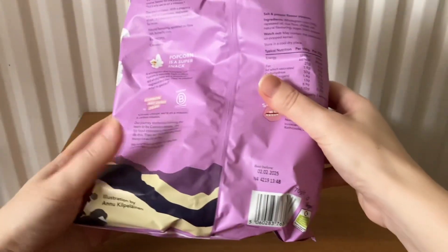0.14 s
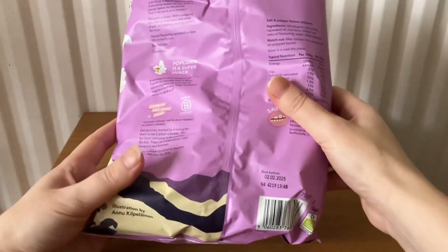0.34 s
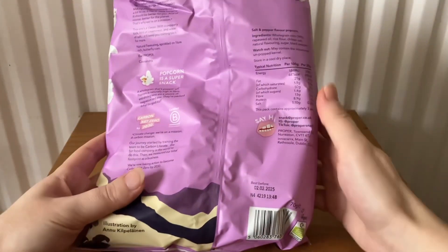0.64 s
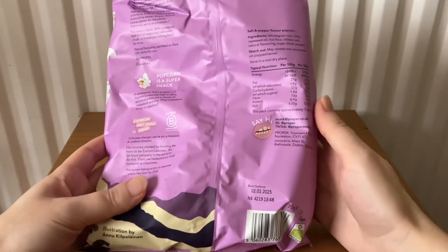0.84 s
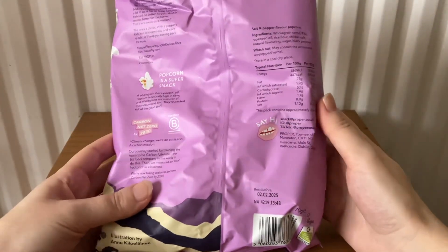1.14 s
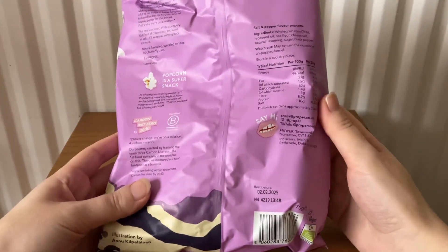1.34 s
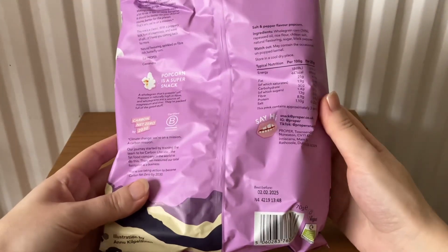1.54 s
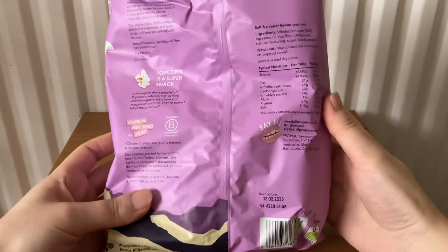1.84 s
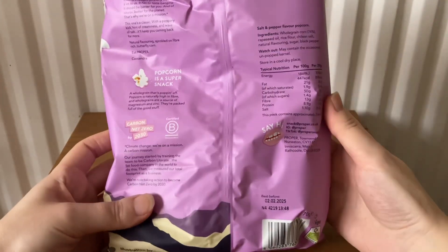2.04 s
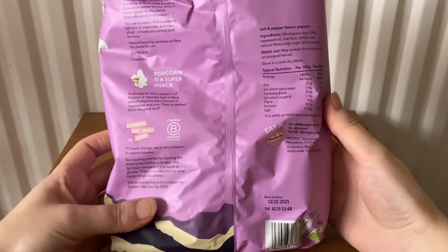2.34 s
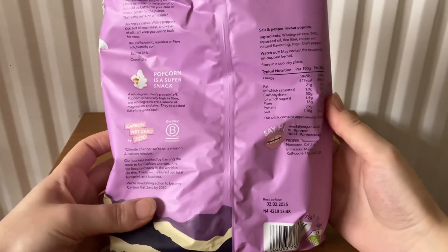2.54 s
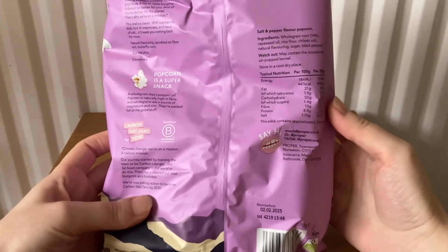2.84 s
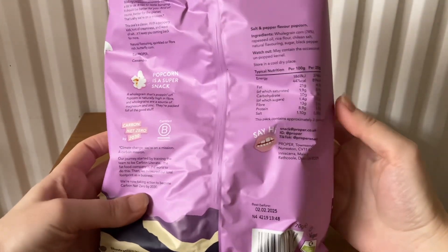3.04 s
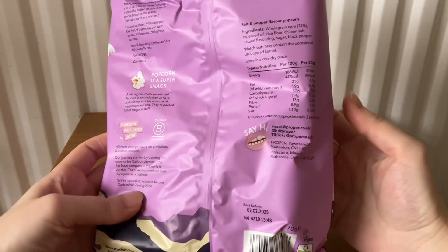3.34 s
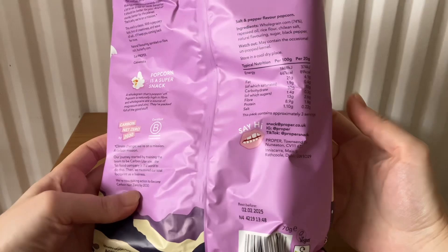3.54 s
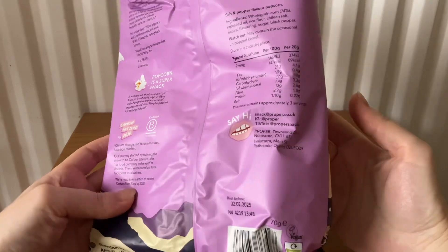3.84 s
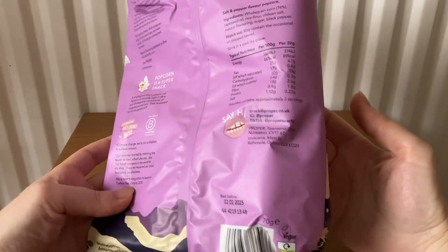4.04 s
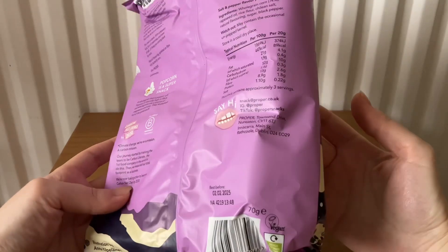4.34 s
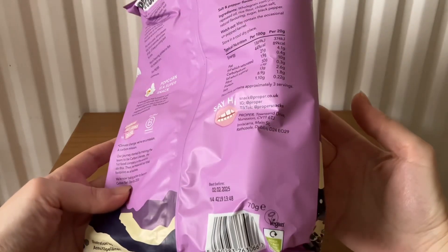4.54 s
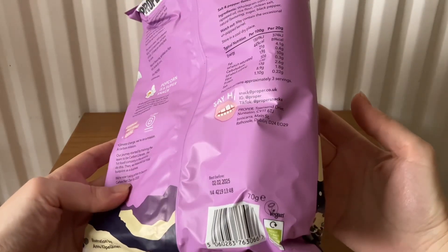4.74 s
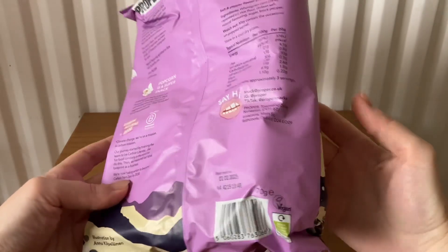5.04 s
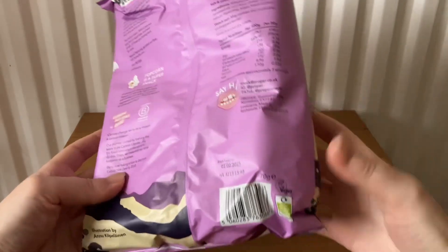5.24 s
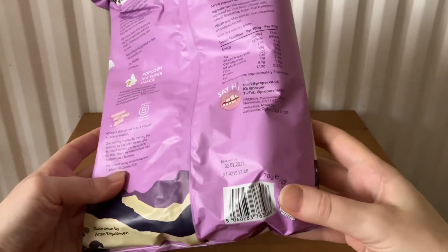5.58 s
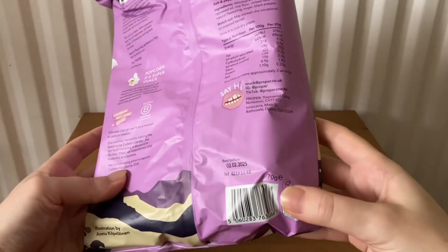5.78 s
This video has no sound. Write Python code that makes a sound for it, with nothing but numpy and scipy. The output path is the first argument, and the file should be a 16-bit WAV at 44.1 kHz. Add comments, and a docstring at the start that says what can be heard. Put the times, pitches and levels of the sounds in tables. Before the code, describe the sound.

A plastic snack bag crinkles and snaps as hands turn it, with soft thumps, thinning to faint rustles before a last crackle.

```python
"""Snack bag turned by hand

Two hands turn a full plastic bag over a wooden table, close to a phone in a quiet room.
Creases of the film snap one by one, small ones rustle round them and under sliding fingertips,
and the air and filling inside thump. Table and walls echo it over a low room hum.
The phone's low cut slides up twice, briefly."""
import sys
import numpy as np
from scipy import signal
from scipy.fft import rfft, irfft
from scipy.io import wavfile

SR = 44100
rng = np.random.default_rng(int(sys.argv[2]) if len(sys.argv) > 2 else 0)


def file_out(sig):
    """Save sig as 16-bit WAV at sys.argv[1]."""
    # one column per channel
    cols = np.atleast_2d(sig).T
    # limit, then scale
    lim = np.clip(cols, -1, 1)
    pcm = np.round(lim * 32767).astype(np.int16)
    wavfile.write(sys.argv[1], SR, pcm)


N = 260631
SIDES = np.array([[1], [-1]])  # left, right


def undb(db):
    return 10 ** (np.asarray(db) / 20)


def unit_rms(x):
    return x / np.sqrt(np.mean(x ** 2))


def band(x, lo_hz, hi_hz):
    sos = signal.butter(2, [lo_hz, min(hi_hz, .45 * SR)], "band", fs=SR, output="sos")
    return signal.sosfilt(sos, x)


def add(out, start_s, x):
    i = max(int(start_s * SR), 0)
    x = x[..., :N - i]
    out[:, i:i + x.shape[-1]] += x


# Noise floor: (frequency [Hz], relative density [dB])
HUM_SPECTRUM = [(30, -25), (87, -5), (147, -27.5), (192, -22), (318, -42),
                (473, -28.5), (3030, -47.5), (17000, -59)]

def hum(level_db=-72.5):
    """Building rumble and microphone hiss; the bass is alike on both sides."""
    f = np.fft.rfftfreq(N, 1 / SR) + 1
    hz, db = np.transpose(HUM_SPECTRUM)
    mid, side = rfft(rng.standard_normal((2, N)))
    noise = mid + np.clip(0.24 + f / 900, 0, 1) * side * SIDES
    colour = undb(np.interp(np.log(f), np.log(hz), db))
    return undb(level_db) * unit_rms(irfft(noise * colour, N))


def room(x):
    """Diffuse echo of table and walls: treble dies first, bass is alike on both sides."""
    t = np.arange(int(.4 * SR)) / SR
    mid, side = rng.standard_normal((2, len(t)))
    noise = mid + band(side, 1600, 14000) * SIDES
    onset = np.clip(t / 0.00026, 0, 1)
    response = 0
    for lo_hz, hi_hz, t60_s, db in [(100, 7200, 0.13, -12), (4500, 9800, 0.013, -16)]:
        tail = band(noise, lo_hz, hi_hz) * 1000 ** (-t / t60_s) * onset
        response = response + undb(db) * tail / np.sqrt(np.sum(tail ** 2) / 2)
    response[:, 0] += 1  # direct sound
    return signal.fftconvolve(x, response, axes=1)[:, :N]


# Resonances of the enclosed air: (centre [Hz], width [Hz], gain [dB])
AIR_RESONANCES = [(170, 35, 3.5), (350, 200, 3), (480, 60, 4.5), (612, 130, -8), (900, 150, 3)]

def bag_air(x):
    """Air shut in the bag lifts a few low resonances, with a dip between them."""
    return x + sum((undb(db) - 1) * signal.lfilter(*signal.iirpeak(hz, hz / width_hz, SR), x)
                   for hz, width_hz, db in AIR_RESONANCES)


# Fingertip slides: (start [s], length [s], level [dB])
SLIDES = [(3.031, 0.028, -57), (3.878, 0.089, -68), (4.193, 0.015, -68), (4.566, 0.11, -71.5),
          (4.755, 0.12, -71.5), (5.02, 0.11, -59)]

def slide_power(t, rise_s=0.016, trail_s=0.027):
    """Rustle power under a fingertip sliding on the film: rise, hold, trail."""
    power = 0
    for start_s, length_s, db in SLIDES:
        rise = np.minimum((t - start_s) / rise_s, 0)
        trail = np.maximum((t - start_s - length_s) / trail_s, 0)
        power = power + undb(db) ** 2 * np.exp(2 * (rise - trail))
    return power


def flurry_power(t, snap_db=-28.5, thump_db=-17, build_s=0.0062, settle_s=0.019):
    """Rustle power of creases shaken loose round each snap or thump: builds before, settles after."""
    kicks = np.zeros(N)
    for events, relative_db in ((SNAPS, snap_db), (THUMPS, thump_db)):
        for time_s, db, *_ in events:
            kicks[int(time_s * SR)] += undb(db + relative_db) ** 2
    lag_s = t[:SR] - .5
    envelope = np.exp(2 * np.where(lag_s < 0, lag_s / build_s, -lag_s / settle_s))
    return np.clip(signal.fftconvolve(kicks, envelope)[SR // 2:SR // 2 + N], 0, None)


# Fingers working the film: (time [s], level [dB], bass gain [dB], treble gain [dB])
HANDLING = [(0, -62.5, -4.5, 1.5), (.32, -73, -7, 7.5), (.5, -60, -3, 2), (.95, -58, -3.5, -1.5),
            (1.27, -44.5, -1.5, -5.5), (1.33, -50, -5.5, -2), (1.49, -61, -3, 0), (1.63, -56, -1.5, -1.5),
            (1.84, -60, -3, -6.5), (2.08, -65, 1, 1.5), (2.276, -53, -3.5, -6.5), (2.399, -72.5, -6, -2),
            (2.8, -61, 1, -5), (3.149, -69, -0.5, -1), (3.581, -74, -1.5, -2), (4.101, -72.5, -1.5, -3.5),
            (4.259, -94, -2.5, 2), (5.0, -78.5, -4.5, -2), (5.409, -78, -8, -2.5), (5.683, -45.5, -3, -5.5),
            (5.81, -60, -2.5, 1.5), (5.91, -74, -1.5, 5)]
# Rustle colour: (frequency [Hz], band gain [dB])
RUSTLE_SPECTRUM = [(130, -9.5), (250, -0.5), (420, 2), (630, -1.5), (900, 1.5), (2000, -1.5), (4000, 2),
                   (7000, 2.5), (12000, 2.5), (16000, -14)]

def rustle(creases_per_s=1100, spread_db=3.0, skin_hiss=1.1, band_db=-6.5):
    """Dense tiny creases, mostly faint; skin sliding on the film fills the gaps with even hiss."""
    t = np.arange(N) / SR
    times_s, *curves = np.transpose(HANDLING)
    handling_db, bass_db, treble_db = (np.interp(t, times_s, curve) for curve in curves)
    level = np.sqrt(undb(handling_db) ** 2 + flurry_power(t) + slide_power(t))
    creases = (rng.random(N) < creases_per_s / SR) * undb(spread_db * rng.exponential(size=N))
    colour_hz, colour_db = np.transpose(RUSTLE_SPECTRUM)
    out, strength = 0, rng.standard_normal(N)
    for hz in 130 * 2 ** np.arange(0, 7.1, .5):
        strength = .8 * strength + .6 * rng.standard_normal(N)  # correlated from band to band
        share = undb(11.0 * np.clip(strength, -2, 2) * min(hz / 1500, 1))
        decay_s = 0.0011 * (4000 / hz) ** .5
        bursts = signal.lfilter([1], [1, -np.exp(-1 / (decay_s * SR))], creases * share)
        envelope = unit_rms(bursts) + skin_hiss
        mid, side = rng.standard_normal((2, N))
        noise = mid + (0.15 + 0.66 * min(hz / 2500, 1)) * side * SIDES
        crackle = unit_rms(band(envelope * noise, hz / 2 ** 0.22, hz * 2 ** 0.4))
        bass = np.clip(np.log2(2400 / hz) / 2.2, 0, 1)
        treble = np.clip(np.log2(hz / 3000), 0, 1)
        gain_db = band_db + np.interp(np.log(hz), np.log(colour_hz), colour_db)
        out = out + level * undb(gain_db + bass * bass_db + treble * treble_db) * crackle
    return out


# The filled bag gives way: (time [s], level [dB], nominal pitch [Hz], upper note gain [dB])
THUMPS = [(0.084, -49, 510, -25), (0.156, -44.5, 554, -18), (0.234, -48.5, 313, -6.5),
          (0.386, -45, 328, -19), (0.408, -48, 408, -16), (0.473, -39, 470, 2), (0.481, -36, 460, -1.5),
          (0.596, -32, 364, -18), (0.64, -32, 395, -9), (0.735, -37.5, 463, -2.5), (0.867, -43, 310, -6),
          (0.963, -48, 364, -7), (1.026, -47, 278, -19), (1.062, -42, 302, -9), (1.115, -31.5, 370, -14.5),
          (1.188, -37, 477, -14), (1.211, -33.5, 440, -24), (1.249, -31, 436, 0), (1.27, -25.5, 395, -12.5),
          (1.273, -36.5, 131.8, -23), (1.398, -38.5, 334, -8), (1.577, -38.5, 367, -14.5),
          (1.639, -36.5, 453, -9.5), (1.746, -35, 480, -15), (1.805, -36.5, 450, -0.5),
          (1.872, -25, 400, -11), (1.893, -23, 196, -44.5), (1.898, -40, 122, -16.5),
          (1.916, -35.5, 363, -8.5), (2.017, -36.5, 530, -11), (2.274, -32.5, 384, -2.5),
          (3.048, -39.5, 463, -27), (3.426, -45.5, 345, -4), (3.612, -46.5, 290, -22),
          (3.808, -50.5, 390, -8), (3.907, -44.5, 137, -11), (4.139, -56, 200.6, -8),
          (5.057, -48.5, 480, -20), (5.556, -41, 446, -6), (5.626, -43, 430, -1), (5.685, -30, 352, -7.5),
          (5.692, -37.5, 126, -12), (5.764, -40.5, 413, -4), (5.822, -36.5, 342, -12)]

def thumps():
    """Soft push of the whole bag: a few cycles sagging in pitch, with a hollow note above."""
    out, t = np.zeros((2, N)), np.arange(3000) / SR
    phases_rad = 0.19 * rng.standard_normal((len(THUMPS), 1)) * [.5, -.5]
    for (time_s, db, hz, upper_db), phase_rad in zip(THUMPS, phases_rad):
        upper = undb(upper_db)  # taut bag: more upper note, longer ring, less sag
        decay_s = (0.51 + 0.33 * upper) / hz
        sag_s = 14 * decay_s * (1 + 3 * upper)
        angle = 2 * np.pi * 1.09 * hz * sag_s * np.log(1 + t / sag_s)
        notes = np.sin(angle + phase_rad[:, None]) + upper * np.sin(1.9 * angle)
        envelope = undb(db + 9.0) * t / decay_s * np.exp(-t / decay_s)
        add(out, time_s - .0003, envelope * notes)
    return out


# Snap colour breakpoints, bass and body up to fizz: (frequency [Hz])
SNAP_COLOUR_HZ = [300, 1100, 3700, 11000, 17000]
# Snapping creases: (time [s], level [dB], ring [Hz], body gain [dB], fizz gain [dB])
SNAPS = [(0.1757, -36, 2580, -4.5, -22), (0.182, -29.5, 2550, -37, -23), (0.23, -38, 4100, -18, -12.5),
         (0.3861, -23, 6750, -55, -19.5), (0.4714, -33, 1000, -25, -20), (0.479, -29, 880, -32, -21),
         (0.577, -29.5, 905, -2.5, -5.5), (0.61, -21, 1680, -7, -6), (0.6407, -25.5, 920, -11, -47),
         (0.7319, -25, 7600, -11.5, -13.5), (0.776, -27.5, 2000, -10.5, -16),
         (0.824, -34.5, 1020, 2.5, -15), (0.8679, -36, 900, -2, -15), (0.9589, -29, 3940, -2.5, -6.5),
         (1.0265, -19, 2460, -23, -19), (1.088, -29, 1800, -5, -16), (1.1151, -24, 1060, 1.5, -4.5),
         (1.1613, -27.5, 5170, -9, -20), (1.213, -31.5, 638, -1, -16), (1.2485, -14.5, 11900, -9, -9.5),
         (1.2622, -22.5, 900, -5, -9), (1.2829, -27, 6490, -14.5, -16), (1.383, -28, 970, -2.5, -10.5),
         (1.399, -33, 870, -8, -15), (1.5774, -40.5, 780, 7.5, -27), (1.612, -22, 1430, -6, -11.5),
         (1.6404, -26, 1110, -11, -13), (1.6932, -35.5, 930, 4.5, -27), (1.7476, -21.5, 1170, -12, -18.5),
         (1.871, -18.5, 6850, -7, -11.5), (1.8911, -21.5, 2020, -2, -30), (1.916, -42, 7600, -25, -4),
         (1.986, -27, 1340, 5, -1.5), (2.1268, -35.5, 1210, 3, -15.5), (2.2406, -31, 3300, 0.5, -18),
         (2.2564, -29.5, 1510, 3.5, -5), (2.276, -27, 2250, 2.5, -12.5), (2.3037, -23.5, 2520, -10, -20.5),
         (2.416, -59, 1360, 9.5, -30), (2.4662, -49.5, 7830, -34, -0.5), (2.504, -49, 2240, 4.5, -3.5),
         (2.516, -45.5, 986, -2, -18), (2.599, -54.5, 2060, -26, -2), (2.6519, -43, 2520, 7.5, -17.5),
         (2.667, -32, 1896, -1.5, -11.5), (2.835, -44.5, 2460, 1, -2), (2.857, -58, 7600, -8, -3),
         (2.875, -51, 2800, -6, -11), (2.95, -43, 1290, -4.5, -3.5), (3.0528, -50, 704, -20, -16.5),
         (3.19, -52, 7800, -1, -1), (3.2049, -36, 1990, -14.5, -15), (3.2182, -41, 4390, -28, -14),
         (3.263, -36.5, 1950, -12, -19), (3.2863, -47, 1990, -27, -8), (3.3506, -48, 800, -6, -8),
         (3.4123, -43.5, 855, -5, -43), (3.4237, -33, 775, -2, -10), (3.531, -48, 1140, -3.5, -12),
         (3.636, -25.5, 906, -1, -12.5), (3.7367, -50.5, 920, 2, -3), (3.7674, -47.5, 850, -2.5, -3),
         (3.8702, -51, 746, 6, -13), (3.8979, -46, 6600, -10, -8), (3.9449, -38, 680, 2, -19.5),
         (4.0255, -37.5, 1160, -4, -29), (4.116, -64, 7100, -5, -4.5), (4.1282, -54.5, 613, 13.5, -50),
         (4.161, -45, 7200, -28, -15), (4.531, -55, 4600, -3, -13), (4.564, -48.5, 7340, -34, -18),
         (4.5856, -36, 1320, -14, -9.5), (4.653, -56, 3030, -4, -6), (4.7525, -51.5, 3600, -22, -6),
         (4.7585, -50, 860, 0, -5), (4.778, -55, 900, 6, -8), (4.8468, -53.5, 780, 8, -6),
         (4.858, -57.5, 7600, -19, 8), (4.8863, -41, 1290, -5, -14), (5.0014, -46, 6900, -6.5, -16.5),
         (5.029, -48.5, 1160, 2, 4.5), (5.098, -51, 1830, 1, 0.5), (5.105, -38.5, 770, 3.5, -46),
         (5.1288, -55, 1284, -1, 6.5), (5.152, -56, 5000, -10, -3), (5.432, -51, 3630, -9, -10),
         (5.482, -45, 850, -5, -7.5), (5.5491, -37.5, 720, 0.5, -16), (5.582, -41.5, 1510, 3.5, -18),
         (5.6084, -41, 2150, -3, -9), (5.6278, -30, 899, -12, -27), (5.6615, -39.5, 1180, 6.5, -25),
         (5.679, -19, 2670, -10, -6.5), (5.717, -28, 2200, -9, -5), (5.7287, -38, 7500, 6, -3),
         (5.763, -30, 955, 3.5, -7.5), (5.822, -27, 4350, -8.5, -7.5), (5.842, -24.5, 2200, -7, -46),
         (5.8763, -22.5, 6500, -9, -5.5), (5.891, -20, 2500, -10, -24)]

def snaps(modes=48, ring_db=3.5, sag_s=0.045):
    """Each crease rings its own facet modes; bending waves bring the treble first, the lows late."""
    out, t = np.zeros((2, N)), np.arange(1300) / SR
    cycles_per_hz = sag_s * np.log(1 + t / sag_s)  # facets slacken: pitch halves in sag_s
    draws = rng.random((len(SNAPS), 5, modes, 1))
    for (time_s, db, ring_hz, body_db, fizz_db), (detune, phase, size, side, lag) in zip(SNAPS, draws):
        hz = 170 * 96 ** ((np.arange(modes)[:, None] + detune) / modes)
        breakpoints_db = [body_db - 13, body_db + 2, 0, fizz_db + 13, fizz_db + 6]
        colour_db = np.interp(np.log(hz), np.log(SNAP_COLOUR_HZ), breakpoints_db)
        ring = np.exp(-(np.log2(hz / ring_hz) / 0.25) ** 2)  # largest facet: louder, longer
        gain = undb(db - 5.5 + colour_db + ring_db * ring + 6.26 * (size - 1))
        rise_s = 0.0003 * (4000 / hz) ** 1.167
        decay_s = 0.0012 * (4000 / hz) ** 0.32 * (1 + 0.57 * ring)
        delay_s = 0.0013 * lag ** 2 * (4000 / hz) ** 0.55  # the crease runs from facet to facet
        age_s = np.clip(t - delay_s, 0, None)
        envelopes = gain * (1 - np.exp(-(age_s / rise_s) ** 2)) * np.exp(-age_s / decay_s)
        cycles = hz * cycles_per_hz + phase
        # Short waves reach the two ports from different parts of the facet.
        skew = 0.76 * (side - .5) * np.clip(hz / 2500, 0, 1)
        snap = np.array([np.sum(envelopes * np.sin(2 * np.pi * (cycles + port * skew)), axis=0)
                         for port in (.5, -.5)])
        snap *= np.sqrt(np.sum(envelopes ** 2) / np.sum(snap ** 2))  # stored energy, whatever the phases
        add(out, time_s - .0004, snap)
    return out


def scene():
    """Film coloured by the bag's air, plus thumps, echoing over the hum."""
    film = bag_air(snaps() + rustle())
    return room(film + thumps()) + hum()


# Rises of the low-cut edge: (start [s], top [s], top edge [Hz])
CUT_RISES = [(1.403, 1.761, 199), (2.495, 2.606, 1910)]

def low_cut(x, depth_db=-23.5, on_s=.06, off_s=3.33, rest_hz=130, off_hz=33,
            hold_s=0.0413, fall_oct_per_s=6.23):
    """The phone's sliding low cut: the edge climbs, holds briefly, then falls steadily in octaves."""
    f, t, frames = signal.stft(x, SR, nperseg=1024)
    edge_hz = np.where((t > on_s) & (t < off_s), rest_hz, off_hz)
    for start_s, top_s, top_hz in CUT_RISES:
        climb = np.clip((t - start_s) / (top_s - start_s), 0, 1) ** 0.96
        climb_hz = rest_hz + (top_hz - rest_hz) * climb
        fall = 2 ** (-fall_oct_per_s * np.clip(t - top_s - hold_s, 0, None))
        edge_hz = np.maximum(edge_hz, (t > start_s) * climb_hz * fall)
    stopband = np.clip(np.log2(edge_hz / (f[:, None] + 1)) / 0.032, 0, 1)
    gain_db = depth_db * stopband * np.clip(f[:, None] / 160, .45, 1)
    return signal.istft(frames * undb(gain_db), SR, nperseg=1024)[1][:, :N]


def record(dry, left_db=3, left_lead_s=.0001, merge_hz=5090, treble_lag_s=0.0002186, top_hz=16300):
    """Phone: low cut, two ports, top cut. Left treble is mostly the right's, inverted and late."""
    left, right = rfft(low_cut(dry))
    f = np.fft.rfftfreq(N, 1 / SR)
    left_port = left * undb(left_db * np.clip(f / 1300, 0, 1)) * np.exp(2j * np.pi * f * left_lead_s)
    shared = -right * np.exp(-2j * np.pi * f * treble_lag_s)
    merge_rad = np.clip((f - merge_hz) / 1200 + .5, 0, .8) * np.pi / 2
    left = np.cos(merge_rad) * left_port + np.sin(merge_rad) * shared
    top_cut = signal.ellip(8, .2, 75, top_hz, fs=SR, output="sos")
    return signal.sosfilt(top_cut, irfft(np.array([left, right]), N))


dry = scene()
out = record(dry)
file_out(out)
```